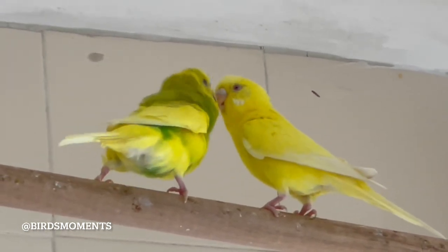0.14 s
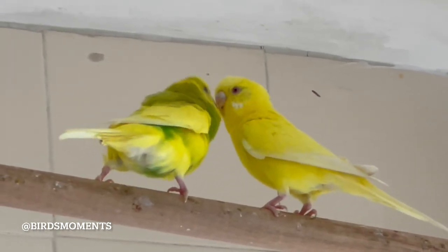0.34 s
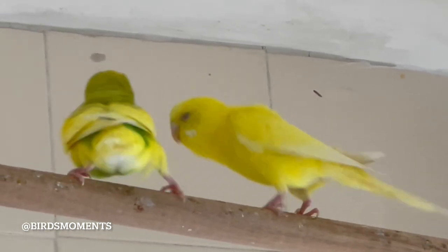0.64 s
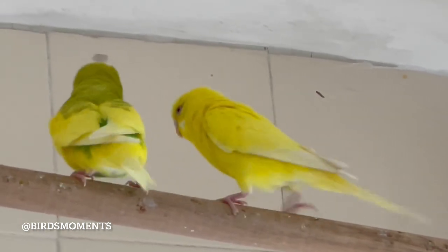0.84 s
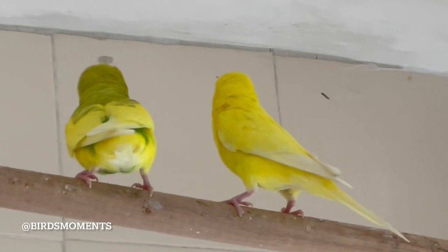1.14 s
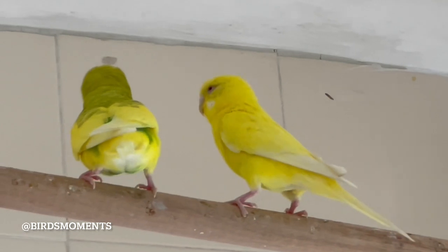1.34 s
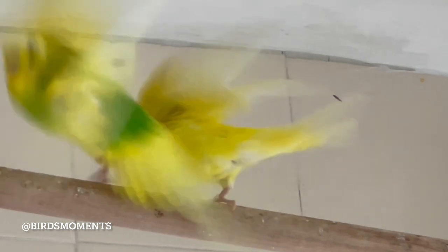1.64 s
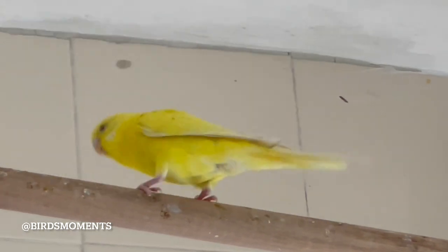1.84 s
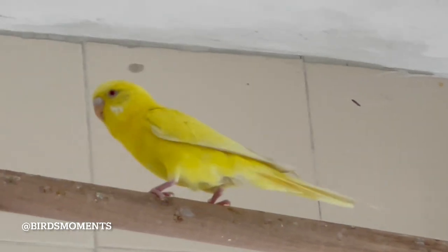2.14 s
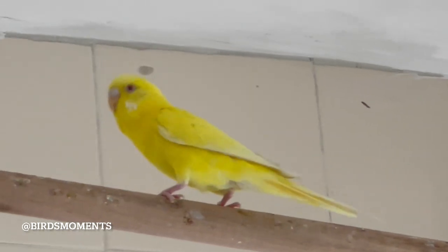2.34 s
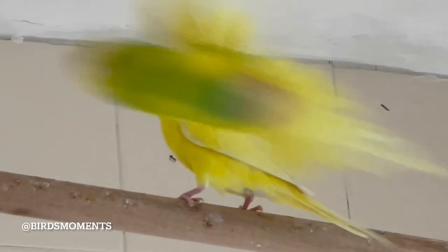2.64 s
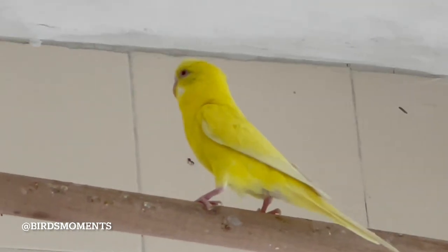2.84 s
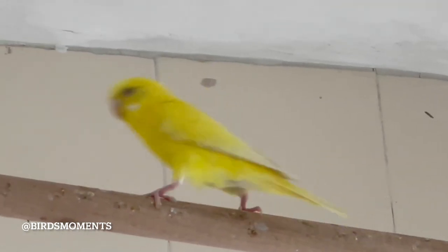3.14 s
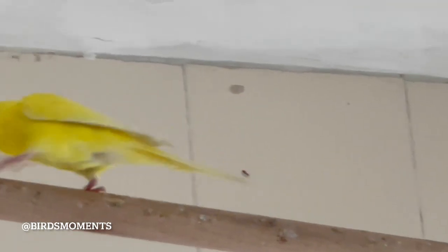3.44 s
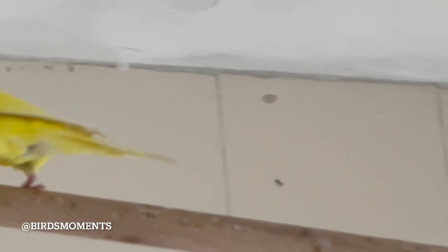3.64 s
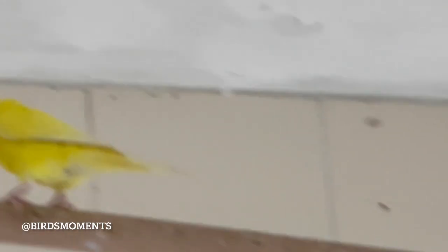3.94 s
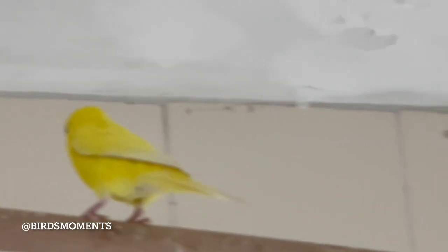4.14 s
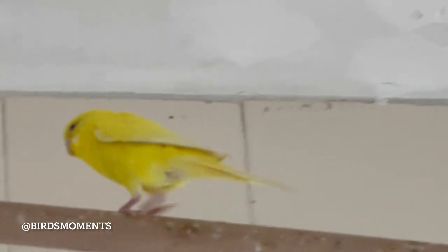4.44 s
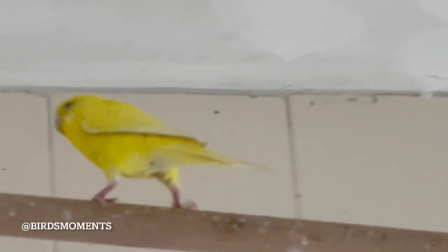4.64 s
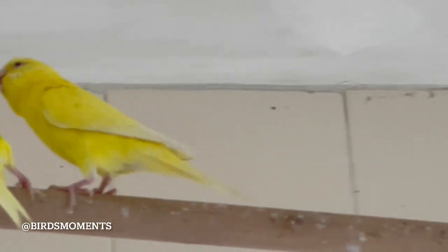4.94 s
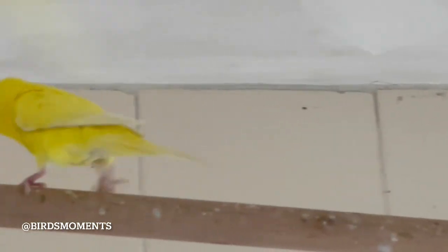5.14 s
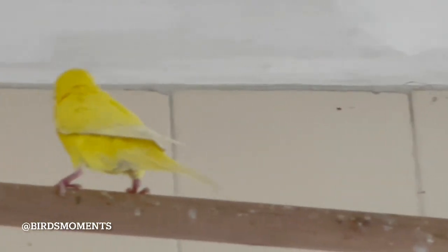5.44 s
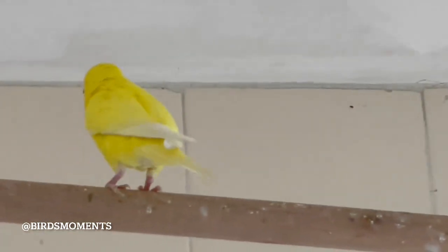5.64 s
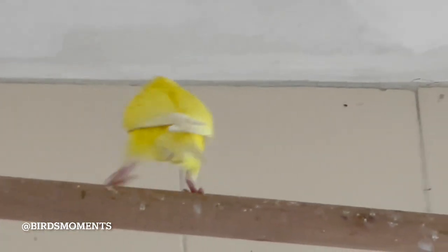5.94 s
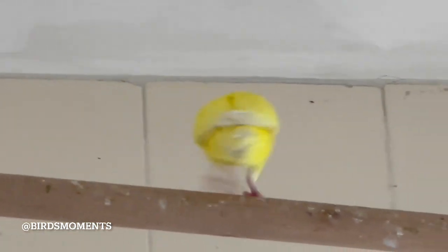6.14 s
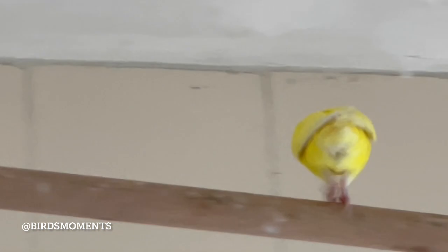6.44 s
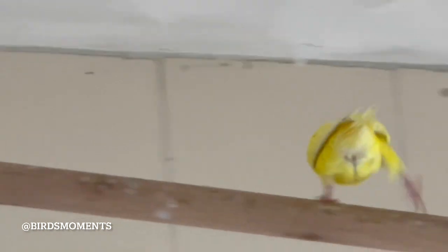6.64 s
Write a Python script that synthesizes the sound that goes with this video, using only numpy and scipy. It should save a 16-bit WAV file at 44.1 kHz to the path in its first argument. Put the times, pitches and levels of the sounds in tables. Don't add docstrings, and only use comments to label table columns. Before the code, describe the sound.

Indoor budgies, close stereo phone pickup with a lively tiled-room echo. Soft isolated chirps lead to a cluster of snapping, buzzy squawks while wings thud softly and fast. After a short gap, the birds warble in tiny clipped whistles and clicks. A second short set of squawks and flaps arrives, followed by clear chirps in small groups. Other birds murmur far off above a faint room hum.

```python
import sys
import numpy as np
from scipy import signal
from scipy.fft import rfft, irfft, next_fast_len
from scipy.io import wavfile
from scipy.ndimage import uniform_filter1d

SR = 44100
rng = np.random.default_rng(int(sys.argv[2]) if len(sys.argv) > 2 else 0)


def natural_amplitude(level_db):
    exponent = np.asarray(level_db, float) / 20
    return 10 ** exponent


def materialize(psi):
    bounded = np.clip(np.atleast_2d(psi).T, -1, 1)
    quanta = np.round(bounded * 32767).astype(np.int16)
    wavfile.write(sys.argv[1], SR, quanta)


N = 298557


def shape(x, table):
    hz, db = np.transpose(table)
    size = next_fast_len(x.shape[-1])
    axis_hz = np.arange(size // 2 + 1) * SR / size + 1
    gain = natural_amplitude(np.interp(np.log(axis_hz), np.log(hz), db))
    return irfft(rfft(x, size) * gain, size)[..., :x.shape[-1]]


def level(x, db):
    return x * natural_amplitude(db) / np.sqrt(np.mean(x ** 2))


def band(x, hz, width_hz):
    return signal.lfilter(*signal.iirpeak(hz, hz / width_hz, fs=SR), x)


def wander(size, rate_hz):
    k = max(int(SR / rate_hz), 1)
    x = uniform_filter1d(uniform_filter1d(rng.standard_normal(size), k), k)
    return x / x.std()


def add(out, x, start_s):
    i = max(int(start_s * SR), 0)
    out[i:i + len(x)] += x[:len(out) - i]


def whistles(notes):
    bright_hz, deep_hz = 3250, 2250
    out = np.zeros(N)
    for start_s, ms, hz0, hz1, db in notes:
        u = np.linspace(0, 1, int(ms * SR / 1000) + 90)
        flutter = wander(4096, 400)[:len(u)]
        husk = wander(4096, 1800)[:len(u)]
        throb_hz, throb_start = 170 + 120 * rng.random(), rng.random()
        hz = (hz0 + (hz1 - hz0) * u ** 0.802) * (1 + 0.028 * flutter)
        phase = 2 * np.pi * np.cumsum(hz) / SR
        if min(hz0, hz1) > bright_hz:
            over = natural_amplitude(-14)
        elif max(hz0, hz1) < deep_hz:
            over = natural_amplitude(-17.5)
        else:
            over = natural_amplitude(-30)
        tone = np.sin(phase) + over * np.sin(2 * phase) + natural_amplitude(-11) * over * np.sin(3 * phase)
        rim = natural_amplitude(-24) * husk * np.sin(.8 * phase)
        throb = 1 + .22 * np.cos(2 * np.pi * (throb_hz * u * ms / 1000 + throb_start))
        edge = np.minimum(u * (ms + 2) / 3.5, (1 - u) / .25)
        swell = np.sin(np.pi / 2 * np.clip(edge, 0, 1)) ** 2
        add(out, natural_amplitude(db + 3.5 + 0.5 * flutter) * swell * throb * (tone + rim), start_s - .001)
    return out


def sing(motif, times):
    notes = []
    for start_s, pace, key_hz, db in times:
        key = key_hz / 3000
        for at_ms, ms, hz0, hz1, note_db in motif:
            notes.append((start_s + at_ms * pace / 1000, ms * pace, hz0 * key, hz1 * key, db + note_db))
    return notes


# start_s, length_ms, start_hz, end_hz, level_db
FREE_NOTES = [(3.21, 4.7, 3000, 3300, -34.5), (0, 19, 2465, 2300, -45), (.004, 28, 3050, 2950, -38.5),
              (.734, 21, 4720, 4750, -53.5), (0.722, 38, 3050, 2900, -48), (.722, 32, 4120, 3800, -53),
              (.72, 34, 2050, 1895, -49.5), (.84, 30, 4150, 3730, -45), (.873, 85, 3537, 3410, -40),
              (.895, 50, 3406, 2960, -35.5), (.901, 45, 2420, 2480, -41), (.933, 62, 3000, 2880, -33),
              (1.318, 63, 2060, 1956, -49), (1.35, 25, 2440, 2360, -48), (1.406, 20, 3200, 3040, -51),
              (1.432, 47, 3100, 2877, -34.5), (1.493, 19.5, 4470, 3620, -35),
              (3.197, 13, 4260, 4140, -42.5), (3.257, 13, 2220, 3720, -32.5), (3.837, 19.4, 2270, 3180, -34),
          (3.853, 15.6, 2970, 3003, -29), (3.904, 42, 1667, 1674, -48), (3.94, 11, 3010, 2400, -34),
          (3.958, 14, 3980, 3960, -47), (4.016, 14, 2020, 2110, -44.5), (4.031, 32, 3710, 3380, -42.5),
          (4.063, 17, 1920, 2230, -44), (4.068, 18.4, 2760, 2700, -29.5), (4.108, 24.5, 3960, 3660, -42.5),
          (4.114, 13, 4530, 5100, -52), (4.121, 7.7, 2465, 2510, -29.5), (4.126, 20.3, 2563, 3220, -33.5),
          (4.136, 10, 3080, 3170, -33), (4.356, 26, 1820, 1850, -38.5), (4.357, 25, 3700, 3550, -45),
          (4.38, 10, 3350, 2540, -30), (4.406, 19, 2880, 2480, -48), (4.43, 14, 2800, 2300, -44),
          (4.462, 30, 2370, 2254, -36.5), (4.489, 14, 2900, 3120, -42), (4.541, 22, 2280, 2060, -50),
              (4.895, 14, 5300, 5200, -56), (6.556, 22.5, 4370, 3550, -56), (4.573, 15, 3600, 3050, -37.5),
           (4.574, 36, 1553, 1740, -45), (4.894, 6.4, 2570, 2660, -42), (5.74, 15.5, 1950, 1420, -43),
           (5.797, 14, 2510, 2470, -33.5), (6.027, 18.6, 5490, 3720, -41), (6.048, 27.4, 3633, 3830, -26.5),
           (6.076, 9.4, 1970, 1830, -47), (6.095, 27, 3003, 2783, -22.5), (6.129, 15.7, 3805, 3430, -27),
           (6.143, 15, 2150, 1890, -42), (6.524, 9.5, 3930, 4130, -46), (6.563, 5.7, 2840, 2600, -34),
           (6.688, 14, 1900, 1910, -38), (6.744, 16, 2010, 3080, -49.5)]
FLICKS = [(1.484, 10, 4900, 4700, -48), (4.588, 10, 3200, 3300, -40), (4.603, 24, 2720, 2640, -30),
          (4.617, 6, 2800, 3150, -36), (4.631, 9, 3100, 2600, -30), (4.612, 16, 2250, 2050, -42),
          (4.689, 10, 3250, 3100, -26), (4.706, 7, 2700, 1900, -38), (4.726, 5, 3100, 2400, -30),
          (4.714, 10, 5000, 5100, -50), (5.78, 8, 2550, 1950, -39), (5.851, 9, 3300, 3150, -31),
          (5.812, 8, 2500, 2000, -43), (5.879, 20, 2650, 2700, -36), (.318, 7, 2750, 2500, -44),
          (1.381, 14, 3100, 3000, -52)]
# offset_ms, length_ms, start_hz, end_hz, level_db
CHEEP = [
    (-23.5, 17, 1950, 1930, -7),
    (0, 19.7, 2950, 2500, -0.5),
]
OPENING = [
    (0, 1.6, 2840, 2940, -4),
    (5.09, 22.6, 2100, 1950, -13),
    (26, 13, 2760, 2520, -2),
]
CREST = [
    (-18, 21.6, 3400, 3660, -9.5),
    (-2.5, 13, 3500, 3050, -2),
    (3.5, 23, 3060, 2950, 0.5),
    (36, 47, 2450, 2370, -12.5),
]
SLIDE = [
    (-75.5, 10, 2600, 2640, -7.5),
    (-21, 22, 3620, 3720, -11),
    (0.5, 31.8, 3480, 2980, -2),
    (42, 24, 2550, 2600, -8),
]
# start_s, stretch, key_hz, level_db
CHEEP_TIMES = [
    (.154, 0.9, 2956, -39.5),
    (0.294, 0.96, 2955, -42),
    (0.434, 1.07, 3070, -40),
]
OPENING_TIMES = [
    (3.207, 0.96, 2922, -27.5),
    (3.79, 0.92, 3057, -29.5),
    (6.535, 1.42, 3022, -29.5),
]
CREST_TIMES = [
    (3.288, .85, 2989, -21),
    (6.615, 1.08, 3050, -24.5),
]
SLIDE_TIMES = [
    (4.673, 0.98, 3020, -26),
    (5.848, 0.97, 2986, -27.5),
]


def chatter():
    motifs = sing(CHEEP, CHEEP_TIMES) + sing(OPENING, OPENING_TIMES)
    motifs += sing(CREST, CREST_TIMES) + sing(SLIDE, SLIDE_TIMES)
    return whistles(FREE_NOTES + motifs + FLICKS)


def squawks(calls, mouth):
    out = np.zeros(N)
    for start_s, ms, hz0, hz1, db, tilt_db in calls:
        u = np.linspace(0, 1, int(ms * SR / 1000))
        shake, uneven, size = (wander(8192, rate)[:len(u)] for rate in (450, 120, 160))
        breath = 1.7 * rng.standard_normal(len(u))
        throb = np.cumsum(205 * (1 + .2 * uneven)) / SR % 1
        bend = 1 + .06 * shake + .11 * uneven + .14 * (.5 - throb)
        half_phase = np.pi * np.cumsum((hz0 + (hz1 - hz0) * u) * bend) / SR
        stack = sum((.55 if k % 2 else 1) * np.cos(k * half_phase + k * k) for k in range(1, 9))
        gate = (.45 + .4 * u + np.sin(np.pi * throb ** .6) ** 3) * natural_amplitude(2.1 * size)
        effort = np.clip(np.minimum((u / .62) ** 1.25, (1 - u) / .3), 0, 1)
        voiced = shape((stack + breath) * gate, mouth)
        call = shape(voiced, [(1500, -tilt_db), (12000, 2 * tilt_db)])
        add(out, level(call, db) * effort, start_s)
    return out


# start_s, length_ms, start_hz, level_db, brightness_db_per_octave
SQUAWKS = [(1.496, 24, 3870, -39, 5), (1.636, 69.5, 3260, -18.5, 3), (1.806, 50, 3050, -17.5, 3.5),
           (2.036, 67, 3595, -21.5, 2), (2.296, 53.6, 3385, -18.5, 1.6), (2.427, 55, 2836, -24.5, -8),
           (2.464, 58, 3516, -19.5, -1.5), (2.615, 52, 3586, -19, 0), (2.772, 68.5, 2990, -16.5, 3),
           (2.85, 60, 2947, -19.5, -1.5), (5.048, 42, 3290, -19, 4.2), (5.197, 65.5, 3104, -19, 3),
           (5.493, 59, 3310, -19, 5.5)]
# start_s, length_ms, level_db
SCOLDS = [
    (.226, 15.6, -36.5),
    (0.515, 12.2, -43.5),
    (.64, 18.4, -45.5),
    (.804, 17, -46),
    (1.052, 19.1, -42.5),
    (1.305, 36, -49),
    (6.602, 55, -54),
]
# start_s, length_ms, start_hz, level_db, brightness_db_per_octave
GRUNTS = [
    (0, 120, 2980, -52, 15),
    (3.939, 22.6, 3300, -40, -9),
    (4.094, 19, 4870, -48, -13),
    (4.355, 32, 3550, -46.5, 3),
    (4.424, 32.6, 2380, -35, -18),
    (4.485, 25, 2570, -58, -26),
    (4.601, 27, 2520, -51, 3),
    (4.831, 33, 3080, -47.5, 2),
    (4.894, 12.7, 2700, -35.5, -12.5),
    (6.071, 18, 3490, -35, -11),
]
# start_s, length_ms, start_hz, level_db
RASPS = [(3.291, 70, 2800, -42), (5.21, 50, 2190, -36), (5.509, 77, 2150, -49), (0.901, 82, 3330, -41),
         (1.5, 42, 3640, -39), (3.257, 30, 2130, -43), (3.828, 42, 2460, -42), (3.956, 58, 2560, -45),
         (4.095, 50.7, 2420, -50), (4.39, 53, 2500, -34.5), (4.445, 69.6, 1933, -36),
         (4.629, 91, 2254, -41.5), (5.789, 101, 2167, -38.5), (6.08, 80, 2050, -48), (6.575, 61, 2250, -48),
         (6.69, 69, 2175, -40)]
# pitch_hz, gain_db
BEAK = [(590, -66), (1000, -59), (1330, -29.5), (1610, -17.5), (2040, -12), (3330, -4.5), (5600, -3),
        (8850, -11), (10200, -10.5), (11300, -12.5), (12700, -21.5), (16500, -29), (22000, -120)]
THROAT = [(900, -34), (1500, -9), (2400, -1.5), (3600, -2.5), (4300, -37), (9000, -17), (13000, -54)]


def harsh_calls():
    rise, sag = 1.09, .94
    beak = [(s, ms, hz, hz * rise, db, tilt_db) for s, ms, hz, db, tilt_db in SQUAWKS]
    beak += [(s, ms, 3050, 3050, db, 14.5) for s, ms, db in SCOLDS]
    beak += [(s, ms, hz, hz * sag, db, tilt_db) for s, ms, hz, db, tilt_db in GRUNTS]
    throat = [(s, ms, hz, hz * sag, db, -2) for s, ms, hz, db in RASPS]
    return squawks(beak, BEAK) + squawks(throat, THROAT)


# start_s, peak_db, centre_hz
SNAPS = [(1.6546, -15, 3580), (1.6604, -13, 3450), (1.665, -12, 3440), (1.6724, -10, 3360),
         (1.8198, -8, 6540), (1.8204, -4, 6420), (1.8305, 0, 5900), (2.0477, -6, 7450), (2.0534, -5, 3710),
         (2.06, -7, 4060), (2.063, -6, 3640), (2.3076, -11, 3290), (2.3156, -13, 5900), (2.316, -7, 3690),
         (2.4358, -12, 2900), (2.4828, -4, 3570), (2.6212, -9, 3110), (2.6337, -6, 3390),
         (2.7924, -15, 8650), (2.799, 3, 5700), (5.056, -19, 3550), (5.0644, -16, 3400), (5.0704, -8, 3800),
         (5.0751, -6, 3420), (5.2071, -4, 5970), (5.2175, -1, 6760), (5.235, -4, 5420), (5.5014, -14, 3550),
         (5.5059, -11, 4880), (5.5129, 0, 7100)]


def snaps():
    out, t = np.zeros(N), np.arange(600) / SR
    for start_s, db, hz in SNAPS:
        rush = rng.standard_normal(600) * np.exp(-t / 0.003)
        ring = band(rush, hz, 900)
        snap = ring / np.abs(ring).max() + natural_amplitude(-2.5) * shape(rush, BEAK)
        add(out, natural_amplitude(db - 10.5) * snap, start_s)
    return out


# start_s,
# length_ms, start_hz, end_hz, level_db
GAPES = [(1.655, 44, 3300, 3450, -24), (1.665, 37, 8700, 8200, -29), (1.815, 51, 6400, 5800, -22.5),
         (1.83, 26, 3200, 3300, -27.5), (2.055, 68, 3500, 5100, -27), (2.047, 30, 7600, 7800, -29),
         (2.315, 41, 5800, 7400, -26.5), (2.32, 43, 3600, 4200, -25), (2.475, 64, 3800, 3500, -23),
         (2.63, 45, 3300, 4100, -21), (2.796, 60, 5400, 7200, -25), (2.78, 32, 8800, 8800, -28),
         (2.87, 40, 3800, 5200, -23), (3.0, 55, 10500, 11500, -48.5), (5.056, 40, 3500, 3400, -23),
         (5.083, 26.4, 6100, 5400, -23.5), (5.066, 23, 7600, 7000, -27), (5.215, 62, 7100, 5300, -23.5),
         (5.505, 46, 7500, 5800, -22), (5.51, 46, 3500, 3700, -27), (2.795, 55, 11600, 11200, -30),
         (2.48, 40, 11600, 11300, -35), (4.11, 30, 4700, 5200, -46), (4.425, 35, 3000, 2100, -38),
         (4.485, 30, 2800, 3500, -40), (4.6, 50, 4300, 4600, -48), (5.063, 30, 11700, 11400, -31),
         (5.22, 45, 11800, 11500, -33)]


def gapes():
    width_hz, throb_hz, lump_db = 1500, 210, 4.5
    out = np.zeros(N)
    for start_s, ms, hz0, hz1, db in GAPES:
        u = np.linspace(0, 1, int(ms * SR / 1000))
        a, b, lump, uneven = (wander(8192, rate)[:len(u)] for rate in (width_hz, width_hz, 130, 120))
        phase = 2 * np.pi * np.cumsum(hz0 + (hz1 - hz0) * u) / SR
        throb = .35 + np.sin(np.pi * np.cumsum(throb_hz * (1 + .2 * uneven)) / SR) ** 2
        carrier = (a + 0.72) * np.cos(phase) + b * np.sin(phase)
        rasp = carrier * throb * natural_amplitude(lump_db * lump)
        swell = np.clip(np.minimum(u / 0.5, (1 - u) / 0.28), 0, 1)
        add(out, level(rasp, db) * swell, start_s)
    return out


# takeoff_s, hardest_s, landing_s, ring_db, swish_db
FLIGHTS = [
    (1.635, 2.223, 2.71, -32, -45),
    (4.992, 5.4, 5.72, -38.5, -45),
]
WING_BEATS = (18.63, 21.4)
# pitch_hz, width_hz, level_db
AIR_MODES = [(74.6, 13, 6.5), (131, 3, 8), (188, 1.6, -5.5)]
# pitch_hz, gain_db
FEATHERS = [(60, -38), (200, 4.5), (300, -9.5), (520, 3.5), (800, -13.5), (1500, -21.5)]


def wings():
    out, t = np.zeros(N), np.arange(N) / SR
    for (up_s, hard_s, down_s, ring_db, swish_db), rate_hz in zip(FLIGHTS, WING_BEATS):
        beat = rate_hz * t % 1
        puff = np.exp(-beat / 0.0057) * natural_amplitude(2 * wander(N, 7.1))
        push = puff - puff.mean()
        ring = sum(natural_amplitude(db - 10 * np.log10(width)) * band(push, hz, width) for hz, width, db in AIR_MODES)
        swish = shape(np.exp(-beat / .5) * rng.standard_normal(N), FEATHERS)
        flying = uniform_filter1d(1. * ((t > up_s) & (t < down_s)), 4000)
        ease = np.interp(t, [up_s, hard_s, down_s], [1, 0, 1]) ** 1.36
        out += (level(ring, ring_db) * natural_amplitude(-22.5 * ease) + level(swish, swish_db)) * flying
    return out


def paths():
    t60_s, echo_s = 0.5, 0.0313
    t, out = np.arange(int(.9 * SR)) / SR, []
    for _ in range(2):
        sparse = rng.standard_normal((2, len(t))) * natural_amplitude(3.37 * rng.standard_normal((2, len(t))))
        tail = sparse * np.exp(-np.log(1000) * t / t60_s) * np.clip((t - .003) / 0.0011, 0, 1)
        low = signal.lfilter(*signal.butter(2, 4800, fs=SR), tail)
        tail = low + (tail - low) * np.exp(-t / 0.35)
        tail *= 1 + 0.43 * np.exp(-((t - echo_s) / 0.0008) ** 2)
        out.append(tail * natural_amplitude(3) / np.sqrt(np.sum(tail[0] ** 2)))
    return out


def room(birds):
    hops_hz = .9
    angle = 2 * np.pi * hops_hz * np.arange(N) / SR
    shares = (np.cos(angle), np.sin(angle))
    return sum(signal.fftconvolve((birds * share)[None], tail, axes=1)[:, :N]
               for share, tail in zip(shares, paths()))


# start_s, length_s, level_db
OUTBREAKS = [
    (0, 0.04, -50),
    (1.635, 1, -49.5),
    (3.98, .01, -71),
    (4.61, 0.022, -50),
    (5.062, 0.71, -39),
    (6.083, 0.085, -47.5),
    (6.69, .02, -52),
]
# pitch_hz, gain_db
FLOCK_TONE = [(1200, -6.5), (1900, 1.5), (2900, 3.5), (4200, -0.5), (6500, -7), (9000, -7.5), (11500, -33),
              (12500, -67)]


def flock():
    gather_db_per_s, hush_db_per_s, quiet_db, top_db = 86, 82, -98, -45
    t, rises = np.arange(N) / SR, []
    for start_s, hold_s, peak_db in OUTBREAKS:
        gather = gather_db_per_s * np.maximum(start_s - t, 0)
        hush = hush_db_per_s * np.maximum(t - start_s - hold_s, 0)
        rises.append(peak_db - gather - hush)
    db = np.clip(np.max(rises, axis=0), quiet_db, top_db)
    murmur = level(shape(rng.standard_normal((2, N)), FLOCK_TONE), 0)
    return murmur * natural_amplitude(db + 5.6 * wander(N, 4.9))


# pitch_hz, gain_db
FLOOR = [(15, -19), (25, -3), (45, 4), (75, -1), (242, -5), (407, -5), (586, -10), (704, -6.5),
         (3030, -16.5), (4840, -29.5), (8370, -26.5), (11200, -26.5), (12700, -54), (16500, -99),
         (22000, -120)]
# pitch_hz, width_hz, level_db
HUM = [(53.5, 11, -56), (91.6, 18, -52), (187.5, 6.5, -60.5), (404, 14, -53), (438, 58, -52),
       (821, 12, -58.5)]


def background():
    out = level(shape(rng.standard_normal((2, N)), FLOOR), -45.5)
    for hz, width_hz, db in HUM:
        hum = level(band(rng.standard_normal((2, N)), hz, width_hz), db)
        out += hum * natural_amplitude(0.51 * wander(N, 5.1))
    return out


# start_s, level_db
NEARNESS = [(0, 1.5), (.55, -2), (.7, -2.5), (1.3, -1.5), (1.55, 0.5), (3.1, -3), (3.2, 3.5), (4.3, 5),
            (4.36, 0.7), (4.6, 4), (5.7, -1), (6.0, 0.7), (6.5, 1)]
# pitch_hz, side_db
UNLIKE = [(60, -21.5), (200, -12), (350, -3.5), (700, 0.5), (1200, -2), (2100, -12), (3800, -6.5),
          (5800, -15), (6700, -21.5), (12000, -28)]


def scene():
    birds = chatter() + harsh_calls() + snaps() + gapes()
    beats = wings()
    mid, side = room(birds) + flock() + background()
    at_s, near_db = np.transpose(NEARNESS)
    direct = birds * natural_amplitude(np.interp(np.arange(N) / SR, at_s, near_db))
    mid = mid + direct + beats
    side = shape(side, UNLIKE) - 0.16 * beats
    return np.array([mid + side, mid - side])


def band_limit(x):
    return signal.sosfilt(signal.butter(12, 12860, fs=SR, output="sos"), x)


# pitch_hz, turns
PORT_TURN = [(7450, 0), (7900, .04), (8350, 0), (8750, 0), (9300, -.27), (10230, -.5), (11000, -.72),
             (11700, -.96), (12350, -1.02), (12750, -1.3)]


def record(dry):
    top_hz = 12750
    size = next_fast_len(N)
    turns = np.interp(np.arange(size // 2 + 1) * SR / size, *np.transpose(PORT_TURN))
    right = irfft(rfft(dry[1], size) * np.exp(2j * np.pi * turns), size)[:N]
    droop = shape(np.array([dry[0], right]), [(28, -14), (44, 0), (11040, 0), (top_hz, -7)])
    rounded = np.tanh(1.128 * droop) / 1.112
    cut = signal.ellip(8, .2, 70, top_hz, fs=SR, output="sos")
    return band_limit(signal.sosfilt(cut, rounded))


dry = scene()
out = record(dry)
materialize(out)
```